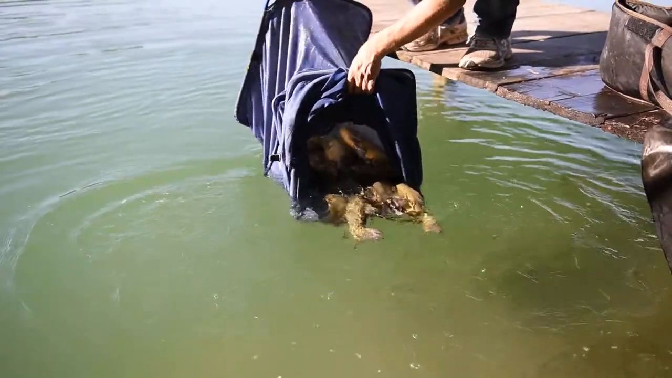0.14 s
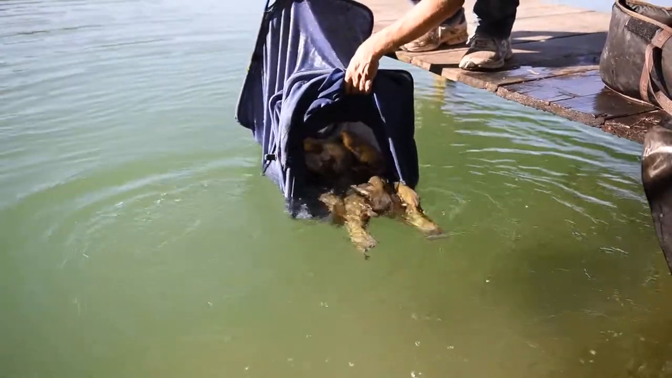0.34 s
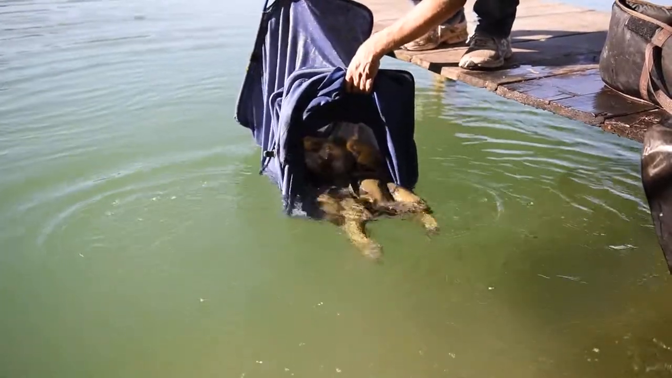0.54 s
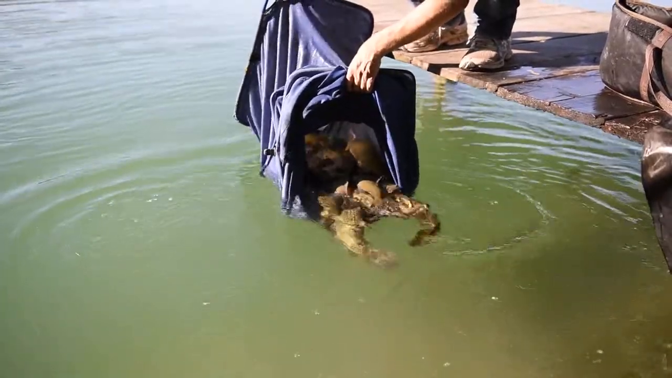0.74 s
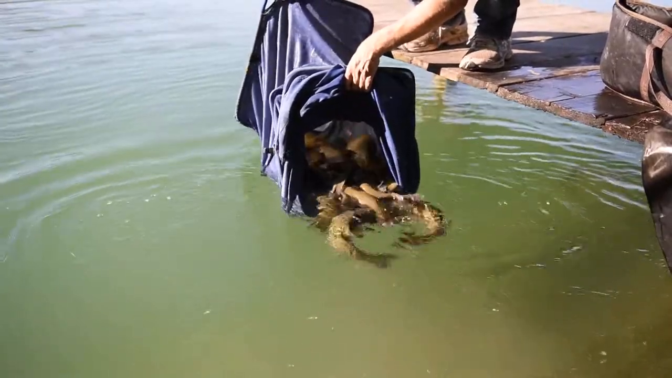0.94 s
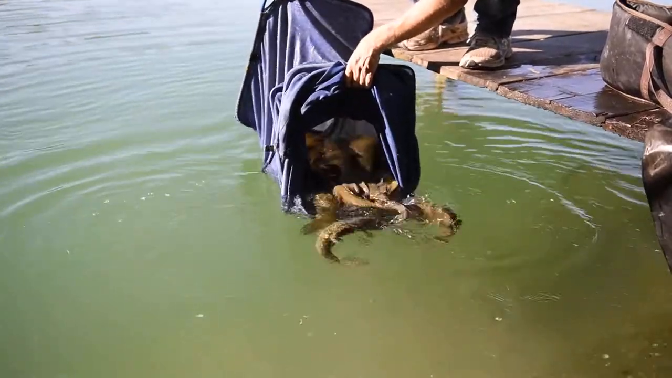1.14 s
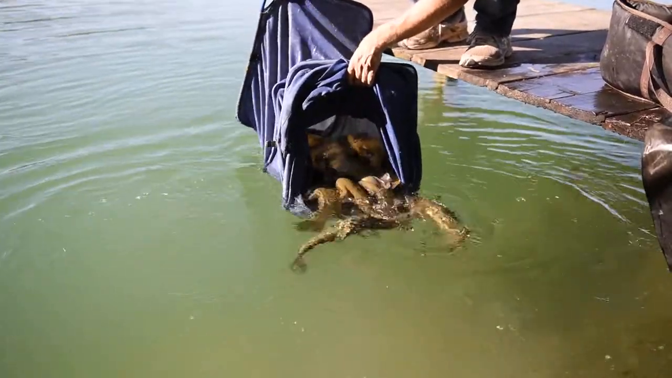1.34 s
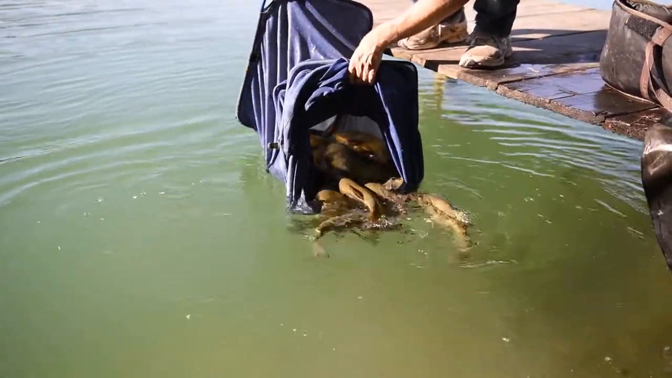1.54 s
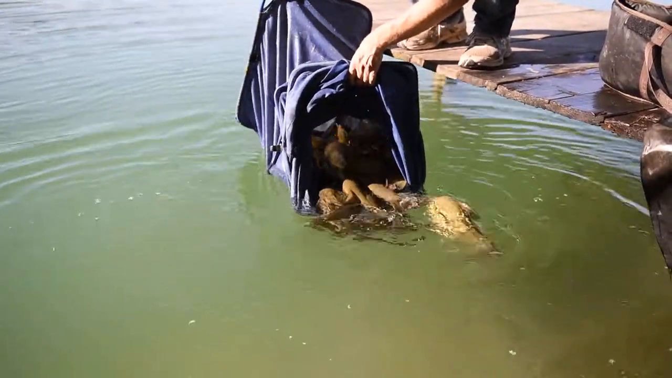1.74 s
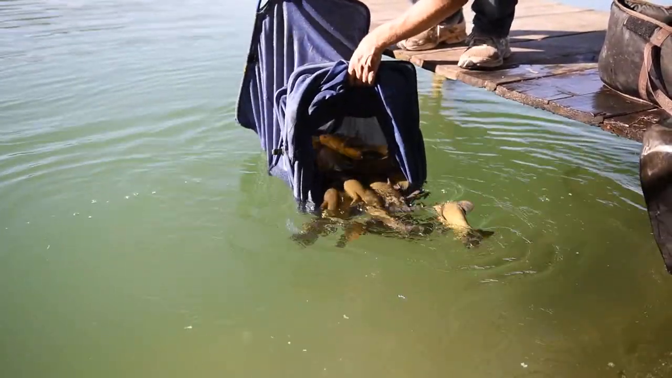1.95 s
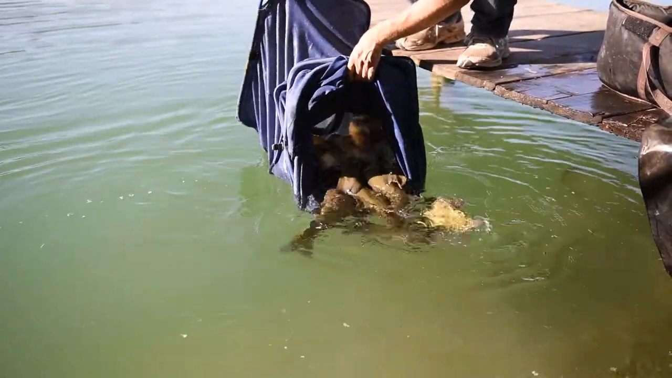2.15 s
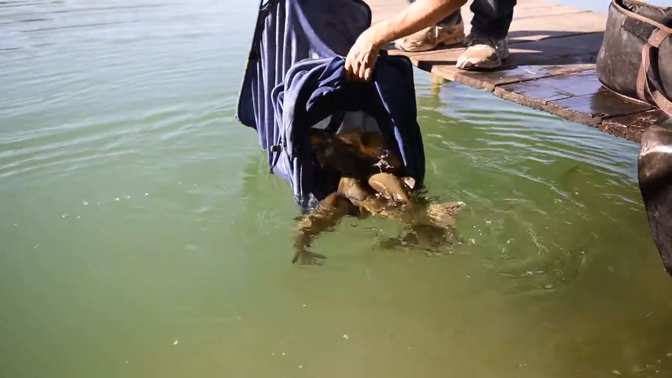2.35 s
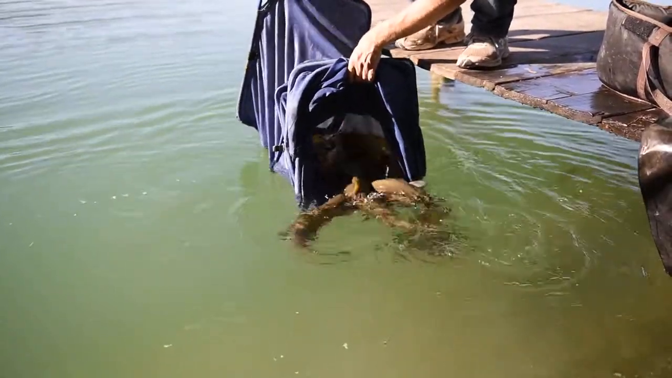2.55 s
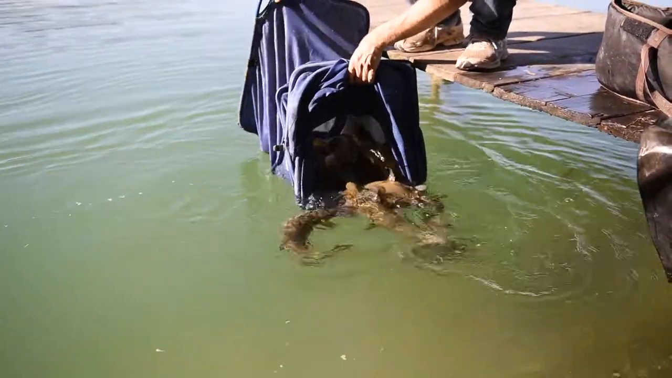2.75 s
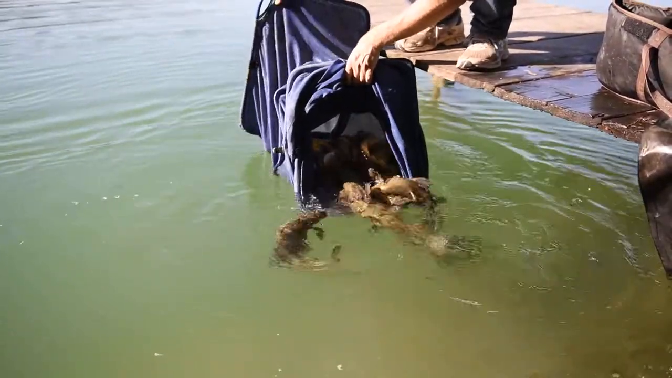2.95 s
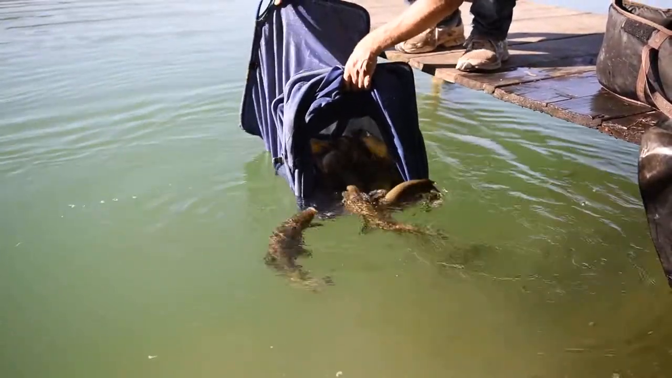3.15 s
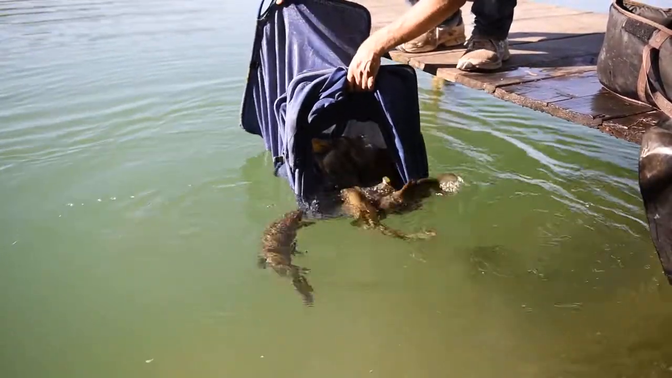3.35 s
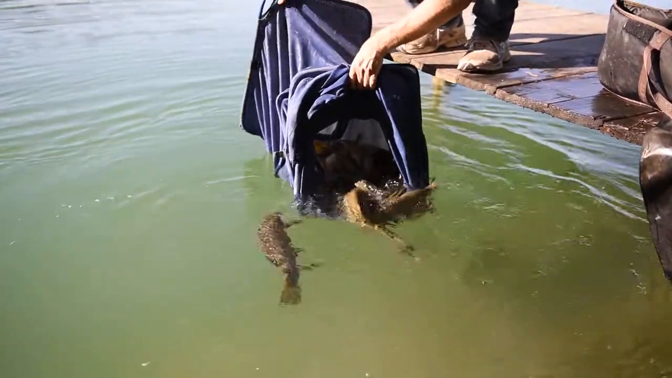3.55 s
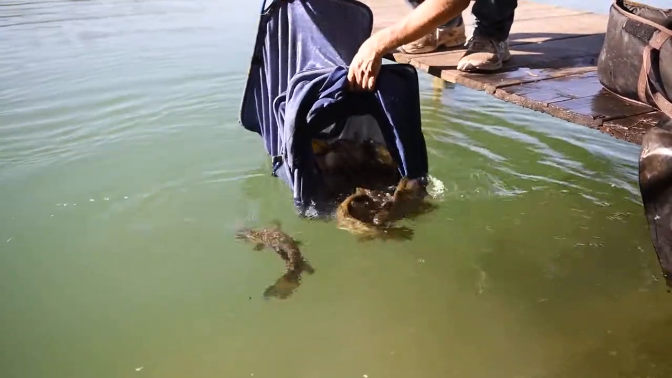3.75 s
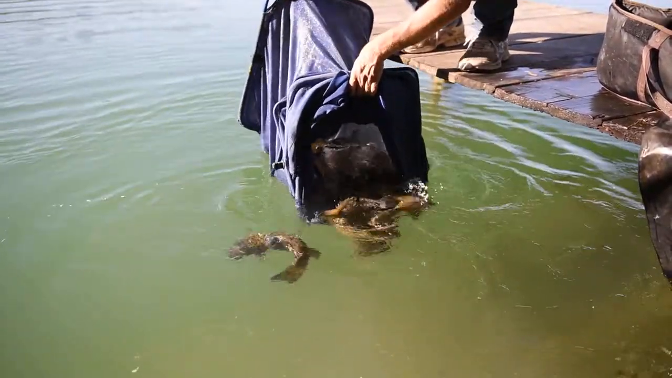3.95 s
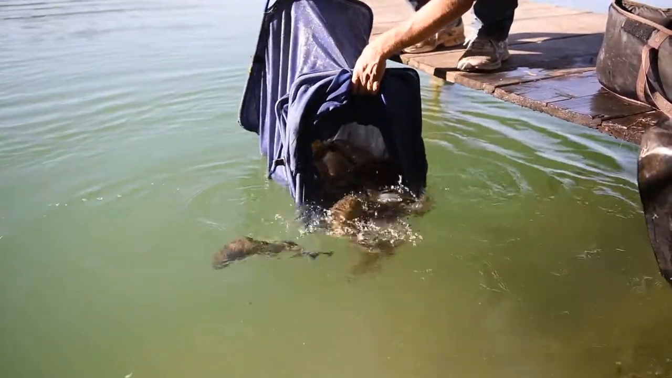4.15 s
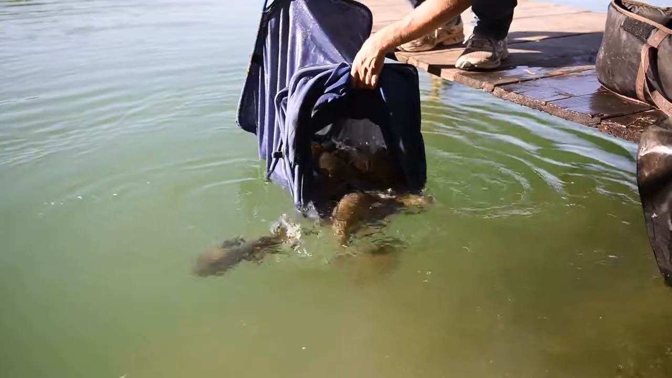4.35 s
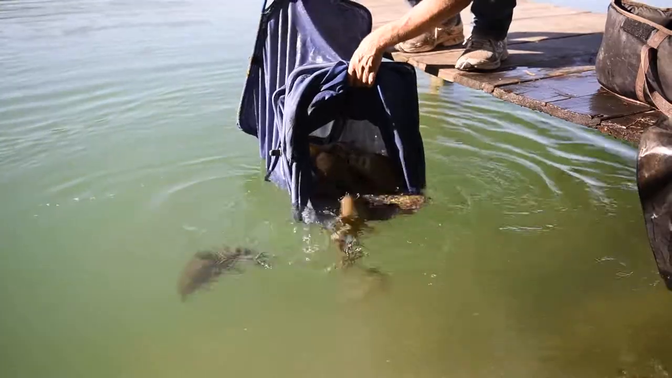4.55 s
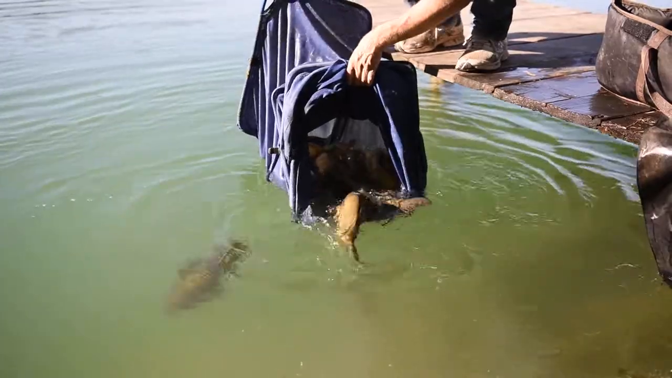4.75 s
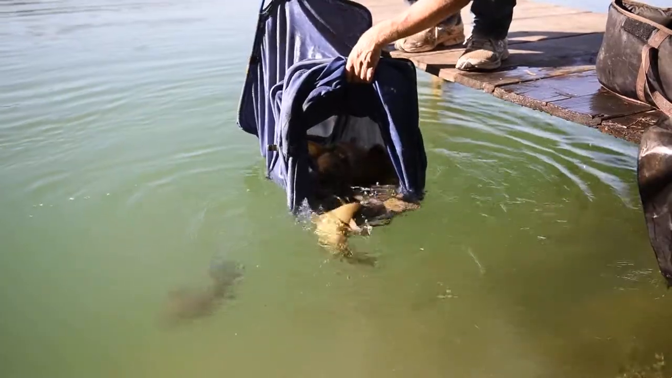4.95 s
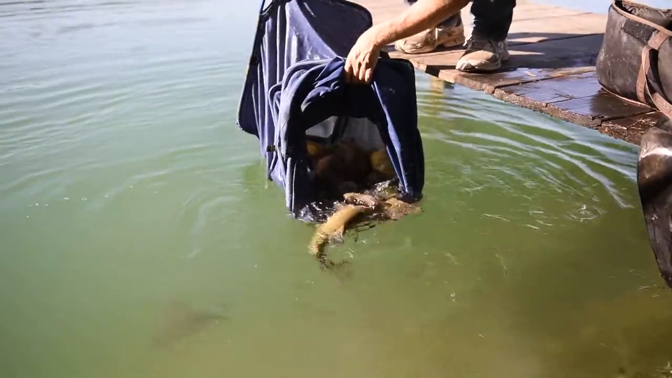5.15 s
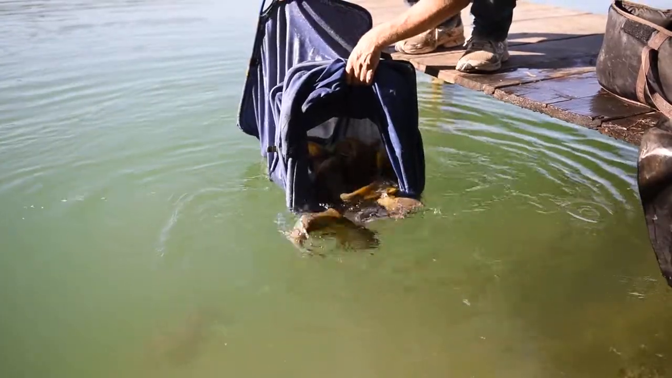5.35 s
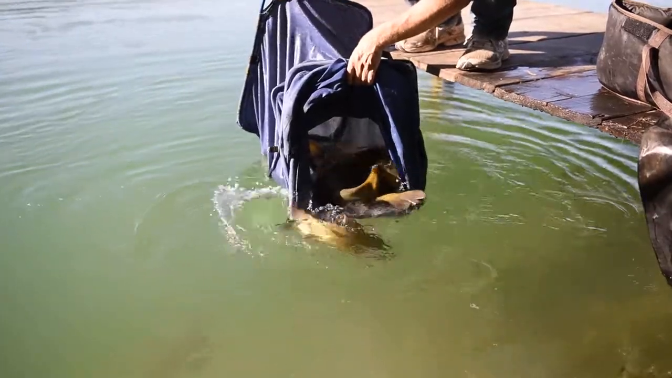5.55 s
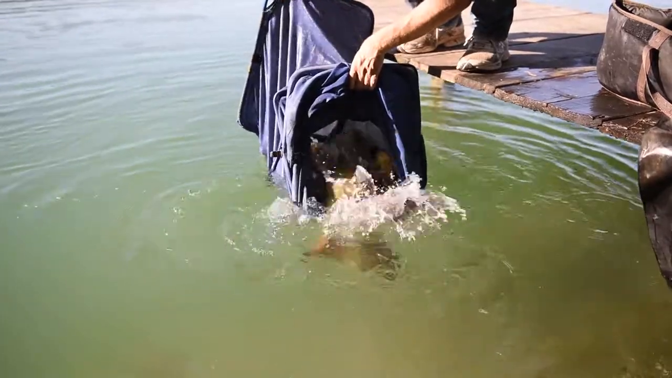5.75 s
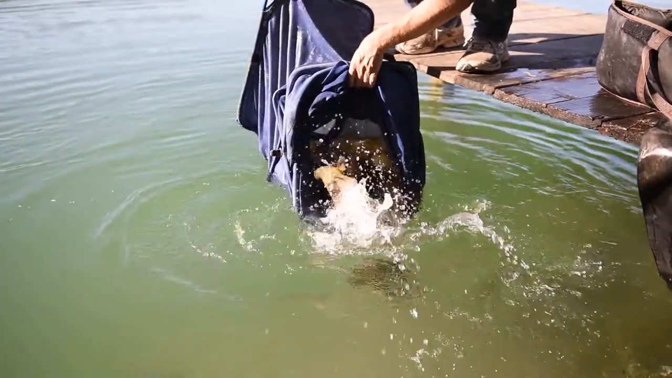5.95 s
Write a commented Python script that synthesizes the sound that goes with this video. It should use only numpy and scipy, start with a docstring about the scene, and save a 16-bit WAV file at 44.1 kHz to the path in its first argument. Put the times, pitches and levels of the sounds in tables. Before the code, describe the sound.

Close to the surface of a lake, fish splash in uneven bursts as they leave a net. Small bubbles and drips fill the quiet gaps between three main outbursts: a brief cluster of wet slaps, a sharp flick followed by busy gurgling, and a final, fuller thrash with hissing spray. Behind the water there is only a faint, low rumble of open air.

```python
"""Fish leaving a keep net

Close to the water beside a wooden jetty on a calm lake, heard by two closely spaced microphone ports.
Fish thrash out of the net: tails slap the surface, trapped air pockets ring with rising pitch,
churned water gurgles and spray patters back.
A low outdoor rumble, a faint hiss and a very faint high whine lie underneath."""
import sys
import numpy as np
from scipy import signal
from scipy.fft import rfft, irfft
from scipy.io import wavfile

SR = 44100
rng = np.random.default_rng(int(sys.argv[2]) if len(sys.argv) > 2 else 0)


def store_pcm(level_fs):
    """Save levels as 16-bit WAV."""
    pcm = np.round(np.clip(level_fs, -1, 1) * 32767).astype(np.int16)
    wavfile.write(sys.argv[1], SR, np.atleast_2d(pcm).T)


N = 264600   # 6 s

# Air pockets that ring out clearly: t/s, level/dB, starting f/Hz, t60/s
AIR_POCKETS = [(0.097, -37, 1300, 0.056), (0.114, -30, 710, 0.018), (0.295, -35, 1410, 0.03),
               (0.321, -38, 1030, .045), (0.333, -37, 3360, .016), (0.528, -32.5, 618, 0.028),
               (0.559, -40.5, 1324, 0.054), (0.712, -38, 3570, 0.022), (1, -42, 990, 0.052),
               (1.139, -36.5, 1120, 0.029), (1.179, -22.5, 2180, 0.012), (1.304, -28.5, 2220, 0.019),
               (1.376, -38.5, 934, 0.18), (1.483, -33.5, 2676, 0.029), (1.557, -35, 1060, 0.063),
               (1.665, -41.5, 1240, 0.1), (1.971, -28, 1836, 0.04), (2.054, -14, 617, 0.032),
               (2.211, -17.5, 792, 0.039), (2.208, -22, 1470, 0.036), (2.214, -9, 3290, 0.026),
               (2.212, -34, 200, 0.16), (2.269, -13, 975, 0.011), (2.269, -13.5, 1780, 0.014),
               (2.454, -33, 2130, 0.04), (2.722, -35.5, 883, 0.063), (2.758, -26.5, 1270, 0.034),
               (2.856, -22.5, 1240, 0.012), (2.967, -33, 1860, .03), (2.975, -25.5, 2564, 0.011),
               (2.988, -29, 3580, .018), (3.077, -26.5, 2700, 0.013), (3.083, -35.5, 1380, .03),
               (3.1, -31.5, 1470, 0.02), (3.113, -27.5, 985, .008), (3.333, -35, 1910, 0.034),
               (3.367, -33, 638, 0.059), (3.445, -27, 2190, 0.013), (3.481, -32, 673, 0.056),
               (3.532, -32, 1904, 0.023), (3.688, -34, 787, 0.079), (3.709, -32, 1537, 0.025),
               (3.933, -3, 2163, 0.016), (4.027, -26.5, 1410, 0.044), (4.097, -27, 1733, 0.033),
               (4.174, -33.5, 2440, .04), (4.244, -32, 1650, .02), (4.26, -38, 786, 0.13),
               (4.302, -32, 1820, .03), (4.324, -24.5, 2110, 0.025), (4.332, -25.5, 823, 0.056),
               (4.366, -28.5, 992, 0.044), (4.422, -30.5, 3090, 0.018), (4.439, -27, 1238, 0.079),
               (4.491, -38, 499.4, 0.087), (4.598, -21.5, 870, 0.019), (4.643, -24.5, 810, 0.041),
               (4.713, -18.5, 818, 0.024), (4.784, -33, 1007, 0.054), (4.823, -33, 1670, 0.03),
               (4.985, -29.5, 2800, 0.025), (5.001, -26, 500, 0.076), (5.043, -28.5, 1305, 0.061),
               (5.16, -29.5, 2520, 0.015), (5.236, -34, 3067, 0.015), (5.468, -23, 1440, 0.016),
               (5.091, -20, 2670, 0.013), (5.184, -27.5, 694, 0.051), (5.444, -25.5, 2400, 0.012),
               (5.502, -24, 1070, 0.026), (5.56, -19, 543, 0.05), (5.678, -17, 1166, 0.03),
               (5.68, -2.5, 2744, 0.0098), (5.679, -37, 179, 0.055), (5.728, -22.5, 750, .035),
               (5.746, -14.5, 1242, 0.026), (5.793, -17.5, 956, .014), (5.823, -17.5, 841, 0.03),
               (5.826, -10, 2120, .007), (5.863, -14, 511, 0.05)]
# Tail slaps and flicks: t/s, level/dB, t60/s
TAIL_SLAPS = [(1.174, -36.5, 0.05), (1.302, -40, 0.072), (1.849, -42.5, .1), (2.0299, -35, 0.2),
              (2.169, -22, 0.05), (2.1982, -17.5, 0.047), (2.2124, -9, 0.02), (2.359, -33, .09),
              (2.721, -38.5, 0.15), (2.843, -40, .1), (2.967, -35, 0.07), (3.931, -16.5, 0.038),
              (4.2599, -25, 0.0091), (4.3238, -24, 0.049), (4.354, -23.5, 0.015), (4.3891, -17, 0.013),
              (4.619, -29, 0.05), (5.018, -32, 0.025), (5.6331, -26.5, 0.17), (5.68, -2, 0.026),
              (5.88, -27, .08)]
# Spectrum of impacts and spray: f/Hz, level/dB
SPLASH_SPECTRUM = [(150, -28.5), (805, -7), (923, -6.5), (3490, -9.5), (11500, -21), (16000, -36.5)]
LUMPS_HZ = 147   # how fast the level wavers within a splash


def from_db(db):
    """Decibels to gain."""
    return 10 ** (np.asarray(db) / 20)


def rms_one(x):
    """Scale to rms 1."""
    return x / np.sqrt(np.mean(x ** 2) + 1e-20)


def at_hz(points, hz):
    """Read a table on a log-frequency axis."""
    freqs, values = np.transpose(points)
    return np.interp(np.log(hz), np.log(freqs), values)


def colour(x, spectrum, size=4096):
    """Filter by a table of f/Hz, level/dB with minimum phase, so nothing sounds early."""
    hz = np.maximum(np.arange(size // 2 + 1) * SR / size, 10)
    cepstrum = irfft(np.log(from_db(at_hz(spectrum, hz))))
    cepstrum[1:size // 2] *= 2
    cepstrum[size // 2 + 1:] = 0
    return signal.fftconvolve(x, irfft(np.exp(rfft(cepstrum))))[:len(x)]


def drift(rate_hz):
    """Smooth random wander between -1 and 1: low-passed noise, softly limited."""
    pole = np.exp(-2 * np.pi * rate_hz / SR)
    wander = signal.lfilter([1], [1, -2 * pole, pole * pole], rng.standard_normal(N + SR))
    return np.tanh(rms_one(wander[SR:]))


def add(out, s, sound):
    """Mix a sound in at s seconds."""
    at = round(s * SR)
    out[at:at + len(sound)] += sound[:max(N - at, 0)]


def bubble(level_db, hz, t60, rise, swell_s, hold=1):
    """A damped sine climbs `rise` octaves/s as the bubble nears the surface; half an octave up it bursts."""
    t = np.arange(int(t60 * SR) + 2) / SR
    turns = np.cumsum(hz * 2 ** np.minimum(rise * t, 1)) / SR
    burst = np.maximum(rise * t - .5, 0)
    fade_db = -60 * ((t / t60) ** hold + burst)   # hold > 1: lingers, then stops quickly
    return (1 - np.exp(-t / swell_s)) * from_db(level_db + fade_db) * np.sin(2 * np.pi * turns)


def impacts(rows, tilt_db, tail_db, lump_db=0):
    """Each hit on the water is a fast-dying noise burst with a weaker tail; tilt_db is per octave."""
    out, t = np.zeros(N), np.arange(SR // 5) / SR
    lumpy = rng.standard_normal(N) * from_db(lump_db * drift(LUMPS_HZ))
    splash = rms_one(colour(lumpy, SPLASH_SPECTRUM))
    for s, level_db, t60 in rows:
        attack = 1 - np.exp(-t / (0.074 * t60))
        decay = from_db(-60 * t / t60) + from_db(tail_db - 60 * t / (1.25 * t60))
        at = min(round(s * SR), N - len(t))
        add(out, s, from_db(level_db) * splash[at:at + len(t)] * attack * decay)
    return colour(out, [(750, -3 * tilt_db), (12000, tilt_db)])


def outdoor_air(level_db, patchy_db):
    """Rumble and hiss over the lake: half-octave bands swell separately, steadier in the bass."""
    # Spectrum of the ambience: f/Hz, level/dB
    spectrum = [(52, -14), (68, 5), (90, -8.5), (163, 3), (250, -3), (340, -7), (1000, -9.5), (7600, -30.5),
                (16000, -42)]
    # Likeness of left and right: f/Hz, correlation
    likeness = [(100, .985), (250, .97), (640, .8), (3000, .2)]
    out, edges = 0, 25 * 2 ** np.arange(0, 9.6, .5)
    noise = np.array([colour(rng.standard_normal(N), spectrum, size=16384) for _ in range(4)])
    pairs = noise.reshape(2, 2, N)
    for k, (low, high) in enumerate(zip(edges, edges[1:])):
        band = signal.butter(2, [low, high], "band", fs=SR, output="sos")
        mid, side = signal.sosfilt(band, pairs[k % 2])
        alike = np.clip(at_hz(likeness, np.sqrt(low * high)), 0, 1)
        stereo = np.sqrt(1 + alike) * mid + np.sqrt(1 - alike) * side * [[1], [-1]]
        out = out + from_db(patchy_db * (1 - alike / 2) * drift(4)) * stereo
    return from_db(level_db) * rms_one(out)


def whine(hz, level_db):
    """A thin, steady tone, the same on both sides."""
    return from_db(level_db) * np.sin(2 * np.pi * hz * np.arange(N) / SR)


def stirring():
    """Agitation of the water in dB: each slap and pocket adds to the churn, then settles."""
    # Churn between the slaps: t/s, level/dB
    churn = [(0.0, -68), (.53, -66), (1.1, -70), (1.35, -63), (1.76, -68.5), (1.86, -60.5), (1.95, -69.5),
             (2.07, -54), (2.34, -49), (2.45, -62), (2.93, -68), (3.2, -70.5), (3.45, -60), (3.86, -63),
             (4.0, -53), (4.63, -52), (4.78, -60), (4.96, -63), (5.03, -53), (5.21, -53), (5.39, -65),
             (5.53, -46.5), (5.63, -52), (5.75, -39), (6.0, -40)]
    stir_db, settle_t60, usual_t60 = -36, .3, .05
    t = np.arange(N) / SR
    level = from_db(np.interp(t, *np.transpose(churn)))
    surge = (1 - np.exp(-t[:SR] / 0.0089)) * from_db(stir_db - 60 * t[:SR] / settle_t60)
    for s, level_db, *_, t60 in TAIL_SLAPS + AIR_POCKETS:
        add(level, s, from_db(level_db) * (t60 / usual_t60) * surge)   # longer sounds stir more
    return 20 * np.log10(level)


def spray(level_db, gust_db):
    """The finest droplets merge into a gusty hiss, partly different at each port."""
    white = rng.standard_normal(N) + rng.standard_normal((2, N))
    hiss = np.array([colour(port, SPLASH_SPECTRUM) for port in white])
    return from_db(level_db + gust_db * drift(34.0)) * rms_one(hiss)


def splats(busy, centre_hz, octaves, cycles, spread_db, count, size):
    """Clusters of small bubbles, each near one pitch and off to one side, more often in busy water."""
    cluster_s, port_lag_s = 0.023, 1.2e-4
    out, elapsed = np.zeros((2, N)), np.cumsum(busy) / np.sum(busy)
    draws, clusters = rng.random((count, 5)), rng.random((count, size, 4))
    for (when, up, down, force, side), cluster in zip(draws, clusters):
        for late, pitch, life, weak in cluster:
            hz = centre_hz * 2 ** (octaves * (up - down) + pitch - .5)
            t60 = cycles * (.5 + life) / hz
            level_db = -spread_db * np.log(1 - .95 * force) - 10 * weak
            ring = bubble(level_db, hz, t60, rise=pitch / (4 * t60), swell_s=1 / hz)
            ring *= np.sqrt(hz)   # big bubbles ring longer but softer
            s = np.searchsorted(elapsed, when) / SR + cluster_s * late ** 2
            add(out[0], s, (.5 + side) * ring)
            add(out[1], s + port_lag_s * side ** 2, (1.5 - side) * ring)
    return rms_one(out) / rms_one(np.sqrt(busy))   # even power, whatever the density


def drop_ticks(fizz_t60, snap_t60, snap_db):
    """Single drops hit the surface with a dry, bright snap and a short fizz."""
    # Drops landing: t/s, level/dB
    drops = [(0.3765, -45), (1.0922, -43), (0.838, -43), (1.153, -32), (2.4111, -31.5), (2.4662, -19.5),
             (2.802, -49), (3.014, -31), (3.3025, -41), (3.7085, -41.5), (3.8824, -38), (4.846, -32.5),
             (4.916, -33.5), (4.9424, -35.5), (5.119, -35.5)]
    fizzes = [(s, level_db, fizz_t60) for s, level_db in drops]
    snaps = [(s, level_db + snap_db, snap_t60) for s, level_db in drops]
    return impacts(fizzes + snaps, tilt_db=5.5, tail_db=-47)


def pockets(froth_db, twin_db, rough_db_per_khz):
    """Trapped air rings, beats against a neighbour and sheds three weaker bubbles, mostly higher."""
    out, flutter = np.zeros(N), drift(2 * LUMPS_HZ)
    for (s, level_db, hz, t60), shed in zip(AIR_POCKETS, rng.random((len(AIR_POCKETS), 4, 2))):
        rise = 4.5 * np.sqrt(hz / 1000)   # octaves/s: smaller pockets climb faster
        ring = bubble(level_db, hz, t60, rise, swell_s=2.37 / hz, hold=1.26)
        # small pockets are torn by the splash and flutter in level
        torn = ring * from_db(rough_db_per_khz * hz / 1000 * flutter[round(s * SR):][:len(ring)])
        add(out, s, rms_one(torn) * np.std(ring))
        twin_hz = hz * 1.3 ** (shed[0, 1] - .5)
        add(out, s, bubble(level_db + twin_db, twin_hz, t60, rise / 2, swell_s=3 / hz))
        for late, small in shed[1:]:
            froth = bubble(level_db + froth_db, hz * 3 ** (small - .3), t60 / 2, rise, swell_s=0.0031)
            add(out, s + late * t60 / 2, froth)
    return out


def tail_slaps():
    """Tails strike the surface in broad, lumpy bursts of splash."""
    return impacts(TAIL_SLAPS, tilt_db=1.5, tail_db=-9, lump_db=3.0)


def microphone_ports(water, left_lag_s, balance_db, echo_cut_hz):
    """Direct sound reaches the left port a little later and weaker; duller echoes follow."""
    # Echoes off the net and jetty: delay/s, left level/dB, right level/dB
    echoes = [(.0078, -13.5, -49), (0.016, -18, -14)]
    hz = np.arange(N // 2 + 1) * SR / N
    left = irfft(rfft(water[0]) * np.exp(-2j * np.pi * hz * left_lag_s), N)
    out = np.array([from_db(balance_db / 2) * left, from_db(-balance_db / 2) * water[1]])
    dull = signal.sosfilt(signal.butter(1, echo_cut_hz, fs=SR, output="sos"), water)
    for s, left_db, right_db in echoes:
        add(out[0], s, from_db(left_db) * dull[0])
        add(out[1], 1.02 * s, from_db(right_db) * dull[1])
    return out


def scene():
    """Thrashing water close to the microphone, over the lakeside ambience."""
    stir_db = stirring()
    busy = from_db(stir_db / 4)
    gurgle = splats(busy, centre_hz=1500, octaves=1.3, cycles=25, spread_db=2.5, count=520, size=4)
    drips = splats(busy, centre_hz=5500, octaves=1.2, cycles=20, spread_db=5.0, count=400, size=8)
    water = from_db(0.88 * stir_db + 1.5) * gurgle   # grows more slowly with stirring than the spray
    water += from_db(stir_db + 0.5) * drips
    water += spray(stir_db + 3.5, gust_db=5.0)
    water += pockets(froth_db=-5.0, twin_db=-3.5, rough_db_per_khz=3.5)
    water += tail_slaps()
    water += drop_ticks(fizz_t60=0.027, snap_t60=0.0024, snap_db=10.5)
    close = microphone_ports(water, left_lag_s=1.8e-5, balance_db=-1, echo_cut_hz=11700)
    return close + outdoor_air(level_db=-53.5, patchy_db=5.0) + whine(hz=11806, level_db=-85)


def record(dry):
    """The recorder clips at full scale; the deepest bass and the top are cut."""
    bass_cut = signal.butter(2, 34, "high", fs=SR, output="sos")
    top_cut = signal.cheby2(12, 70, 16500, fs=SR, output="sos")
    return signal.sosfilt(top_cut, signal.sosfilt(bass_cut, np.clip(dry, -1, 1)))


dry = scene()
out = record(dry)
store_pcm(out)
```